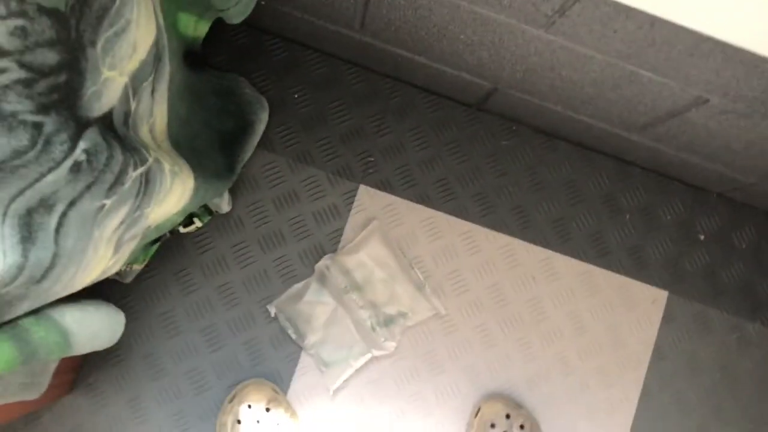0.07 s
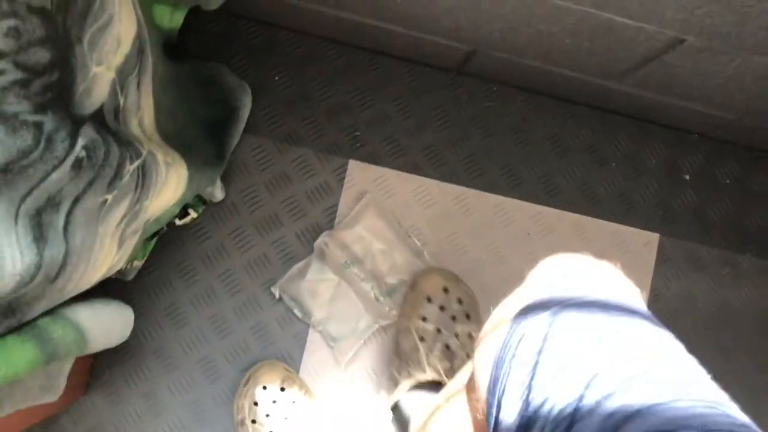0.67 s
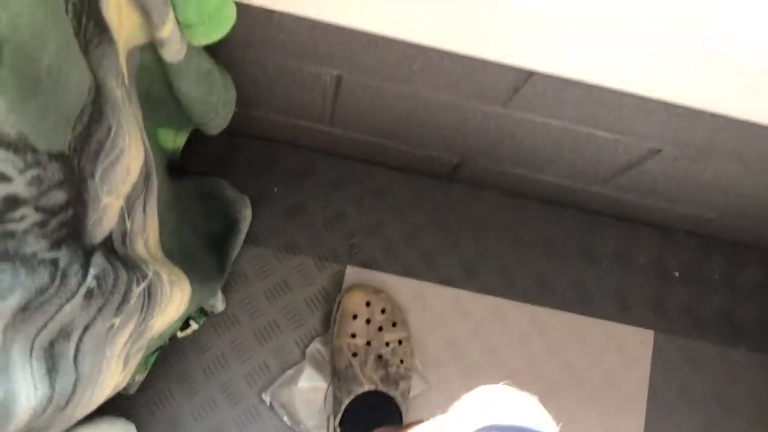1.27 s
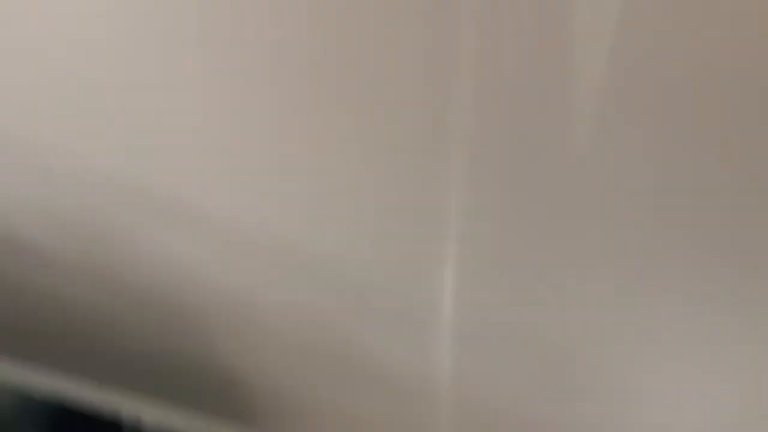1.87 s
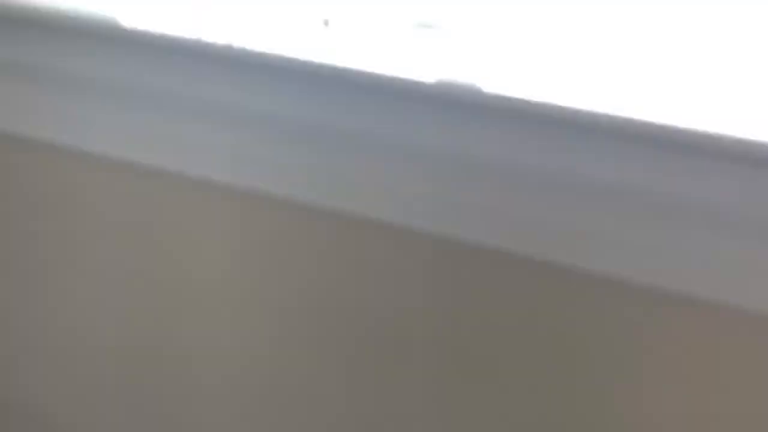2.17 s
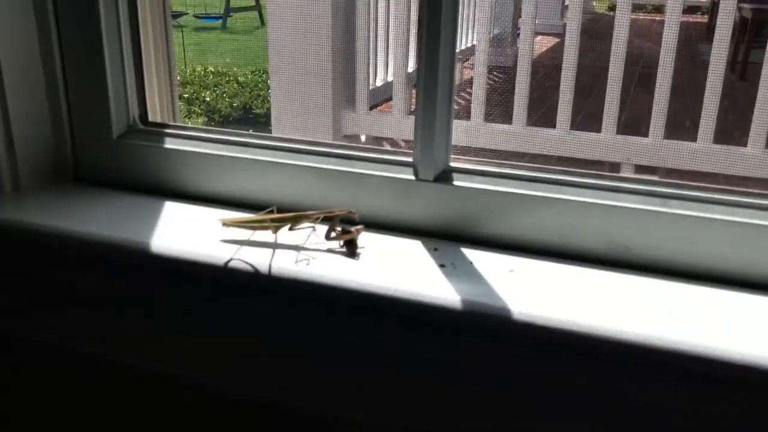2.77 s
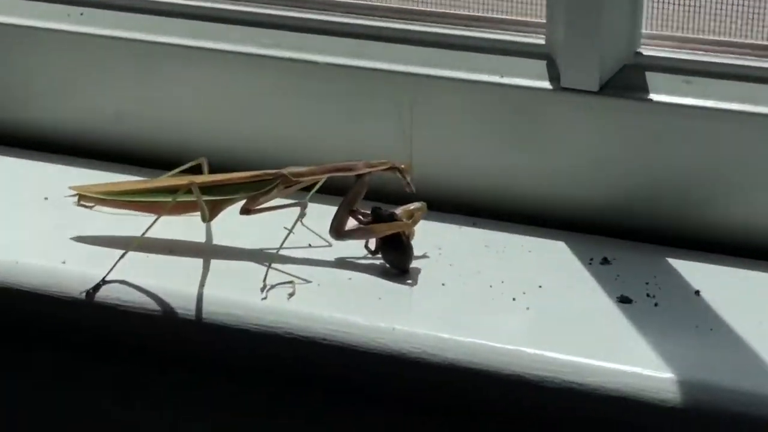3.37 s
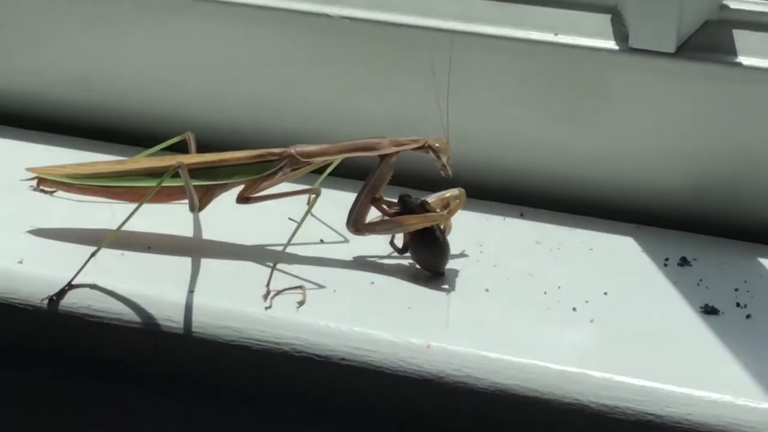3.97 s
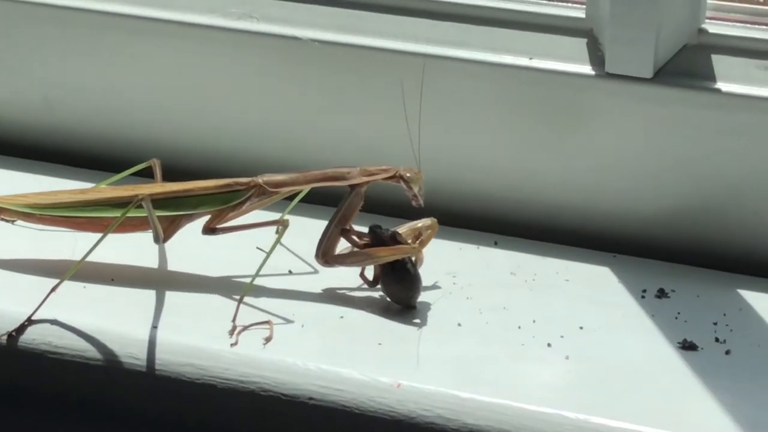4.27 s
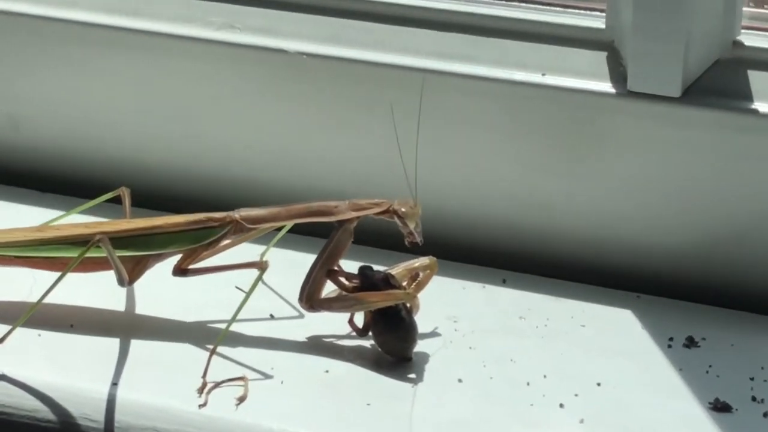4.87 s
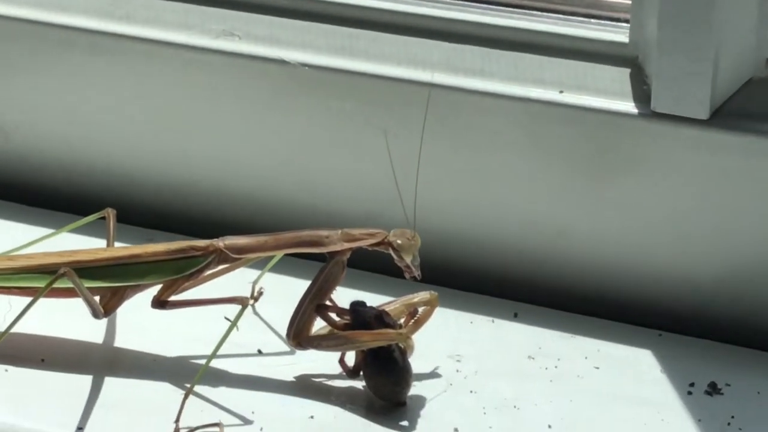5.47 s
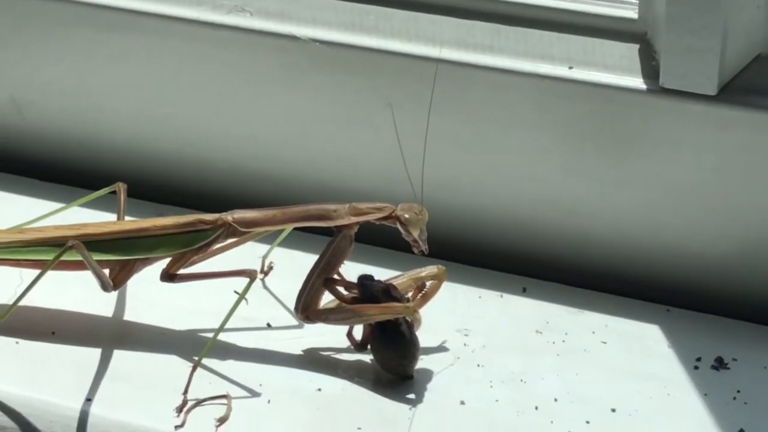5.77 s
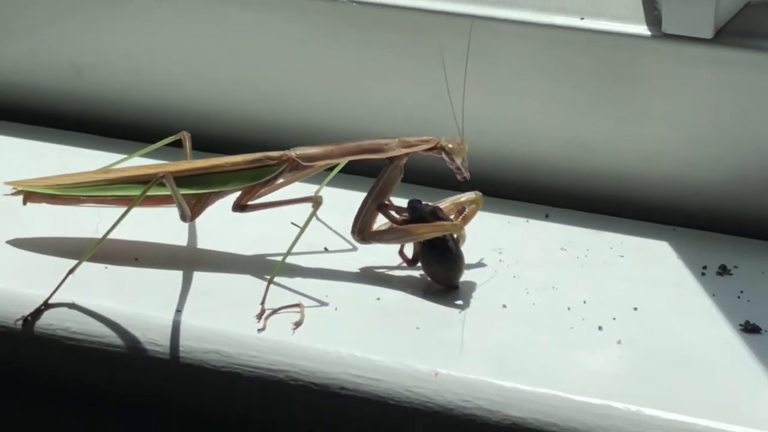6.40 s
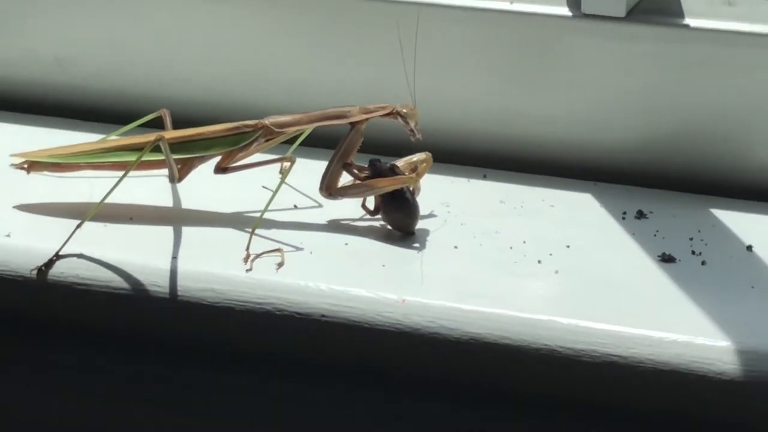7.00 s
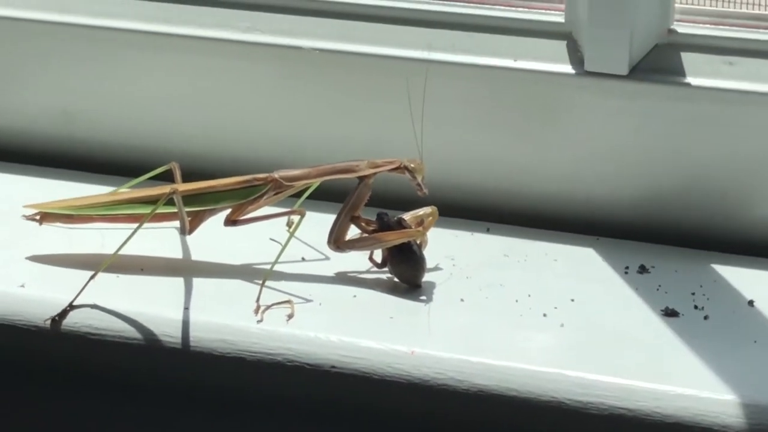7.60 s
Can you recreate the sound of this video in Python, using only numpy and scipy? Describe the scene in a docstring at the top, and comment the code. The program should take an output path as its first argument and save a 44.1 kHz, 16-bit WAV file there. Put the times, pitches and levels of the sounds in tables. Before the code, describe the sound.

After a faint brush of clothing, a plastic air pillow rustles and crackles under a scuffing rubber sole, heard from close by. The crackling eases, then builds as the shoe presses harder, until the pillow pops with a sharp bang far louder than everything else. The echo fills the hard room and fades, and the flat plastic rustles a little more over a faint electrical hum.

```python
"""In a hard, echoing room, a rubber shoe nudges, rubs and treads on a plastic air pillow.
Clothing brushes as the leg moves. The film rustles and snaps as its creases flip, groans as it drags
stretched against the sole, and bursts. The freed air drives a peak limiter and sets the room ringing
for over a second. Then the empty film crinkles again over a low mains hum."""
import sys
import numpy as np
from scipy import signal
from scipy.fft import rfft, irfft
from scipy.io import wavfile
from scipy.ndimage import uniform_filter1d, minimum_filter1d

SR = 44100
rng = np.random.default_rng(int(sys.argv[2]) if len(sys.argv) > 2 else 0)


def wav_out(sig):
    """Save sig, one row per channel (or a flat mono array), as 16-bit PCM at SR to the path in sys.argv[1]."""
    wavfile.write(sys.argv[1], SR, np.round(np.clip(np.atleast_2d(sig).T, -1, 1) * 32767).astype(np.int16))


N = 336924
TIME = np.arange(N) / SR

# The seam splits, then the skin flies open and goes slack.
# Each row: start in seconds, relative peak in dB, first and last pitch in Hz, length in seconds.
BURST_SWINGS = [(4.8117, -3.5, 2200, 1550, .0023), (4.8118, -20, 5900, 5100, .0014),
                (4.8130, 0, 1050, 700, .0027), (4.8148, -15, 480, 300, .005)]
BURST_S = BURST_SWINGS[0][0]
# The taut skin buckles. Each row: start in seconds, peak in dB, first and last pitch in Hz,
# length in seconds.
BUCKLE_SWINGS = [(2.4916, -38, 310, 166, .014), (2.859, -44, 2040, 196, 0.0077),
                 (3.4965, -52, 1180, 251, .007), (3.55, -46, 1900, 176, .009),
                 (4.79, -25.5, 1670, 734, 0.0028)]
# The shoe presses or drags the film. Each row: start and length in seconds, relative levels of crinkle
# and of rubbing in dB, fizz in dB relative to the crinkle.
SHOE_PRESSES = [(0.936, .1, -58, -54.5, -11), (1.06, 0.064, -53, -57, -5), (1.216, 0.34, -51, -51, -13),
                (1.55, 0.26, -49, -53, -16), (1.99, 0.25, -49.5, -51, -22), (2.2, 0.41, -53, -62, -12),
                (2.46, .3, -52, -56, -7), (2.72, 0.22, -58.5, -63, -16), (3.006, 0.093, -58, -65, -24),
                (3.153, 0.068, -57.5, -64, -25), (3.207, 1, -65, -69.5, -12),
                (3.965, .15, -58.5, -67.5, -7), (4.118, .14, -52, -63, -3), (4.2, 0.26, -48, -56.5, -0.5),
                (4.47, .21, -43.5, -56.5, -2), (4.66, 0.12, -51.5, -62.5, -1.5),
                (6.249, 0.23, -61.5, -72.5, -9), (6.42, .15, -59.5, -66, -4.5), (6.52, 0.39, -69, -79, -3),
                (6.914, 0.073, -54.5, -61, -8), (6.948, 0.13, -49, -50.5, -8), (7.011, .3, -56, -66, -15),
                (7.39, 0.22, -59, -76, -3)]
# Single creases snap through. Each row: start in seconds, relative level in dB, offsets of the ring
# and of the fizz in dB.
CREASE_SNAPS = [(0.3496, -43, -9, -7), (0.39, -47.5, -18, -4.5), (0.8954, -42.5, -22, -13),
                (1.6246, -32, -18, -10), (1.6776, -36, -3.5, -15), (1.8966, -49.5, -7, -11),
                (2.2371, -37, 5.5, -17), (2.2812, -42, -13, -14), (2.309, -35.5, -5, -5.5),
                (2.383, -30.5, -22, -20), (2.4244, -35.5, -7, -14), (2.4548, -34, -11, -21),
                (2.5309, -32.5, -3, -5), (2.5541, -37.5, 3, -22), (2.6476, -32.5, -19, -17),
                (2.6744, -35, -22, -16), (2.7998, -40.5, -5, -10), (2.9906, -47, -2, -11),
                (3.045, -52, 3, -23), (3.1535, -48.5, 3, -23), (3.2858, -43.5, -10, -13),
                (3.3328, -41.5, -5, -13), (3.419, -49, -1, -9), (3.533, -43, 1, -13),
                (3.5861, -45, -6.5, -11), (3.693, -38, -3, -10.5), (3.8694, -57.5, -14.5, 2.5),
                (3.9658, -34, -19, -16), (4.0083, -36, -18.5, -4), (4.115, -27, -9.5, -13),
                (4.2664, -34.5, -16.5, -10), (4.2784, -27.5, -3.5, -11), (4.3012, -29.5, -18.5, -13),
                (4.4135, -32, -19, -5.5), (4.4512, -32, -10.5, -10.5), (4.4999, -34, -9, -13.5),
                (4.557, -27.5, -14, -17), (4.5764, -28, -9, -16), (4.6827, -34.5, -17, -10.5),
                (6.0944, -76, -8, 6), (6.1707, -62, -3, -1), (6.262, -49.5, -15, -17),
                (6.3144, -46.5, 5, -9), (6.8533, -51.5, -19, -16), (7.1706, -36.5, -18, -2),
                (7.3768, -36.5, -19, -13), (7.441, -36.5, -27, -7.5), (7.4952, -35.5, -26, -13),
                (7.5926, -46.5, -16, 2.5)]
# The sole scuffs. Each row: start in seconds, level in dB, length in seconds, dull push and floor thump
# in dB relative to that level.
SOLE_SCUFFS = [(0.447, -72, 0.013, 13.5, 13.5), (0.886, -59.5, 0.037, -2, -17),
               (0.949, -49.5, 0.026, -10, -27), (1.235, -43, 0.08, -11.5, -23),
               (1.299, -38, 0.014, -5.5, -19), (1.325, -39, 0.019, -2.5, -18),
               (1.974, -48, 0.038, -9.5, -33), (2.028, -38, 0.015, 0, -3), (2.548, -58.5, 0.026, -4, 7),
               (4.267, -51, 0.045, -8, -9), (4.55, -46.5, 0.036, -18.5, -20),
               (6.951, -45.5, 0.039, -4.5, -13), (7.001, -43, 0.013, -8, -11)]
# The course of the groan. Each row: time in seconds, pitch in Hz, level in dB.
GROAN_PATH = [(4.488, 194.3, -58), (4.518, 189.5, -48.5), (4.546, 181.5, -52), (4.676, 173, -54),
              (4.704, 179.1, -56), (4.738, 188.2, -51.5), (4.768, 189.8, -51), (4.786, 190, -49.5)]
# Clothing brushes as the leg lifts, then swings. Each row: start and length in seconds, level in dB.
LEG_SWISHES = [(0.019, 0.15, -56.5), (0.462, 0.26, -72.5)]
# How the echo dies away, fastest in the high treble.
# Each row: frequency in Hz, time to fall by 60 dB in seconds.
ECHO_FADE = [(60, .72), (150, .78), (350, .88), (700, 1.12), (1800, 1.18), (4000, 1.1), (8000, .76),
             (12000, .54), (16000, .42)]
# The mains hum. Each row: frequency in Hz, relative level in dB.
MAINS_LINES = [(59.2, -9), (118.4, -13), (177.6, -6.5)]

# Spectra of the noises. Each row: frequency in Hz, relative spectral density in dB.
BANG_SPECTRUM = [(25, -33.5), (45, -25.5), (90, -9.5), (125, -14), (200, -7.5), (250, -5.5), (335, -3.5),
                 (450, -7), (620, -1), (860, -1), (1250, -12.5), (1780, -10.5), (2300, -19.5), (6000, -32),
                 (16000, -40.5)]  # the bang as it fills the room
FULL_FILM_SPECTRUM = [(500, -33.5), (900, -11), (1300, -5.5), (1750, 0.5), (2200, -2), (2750, -3),
                      (3500, 0), (5400, -8.5), (7500, -10), (10200, -17), (15000, -16), (16000, -21.5)]  # creases in the inflated pillow
SLACK_FILM_SPECTRUM = [(400, -27), (800, -10.5), (1300, -1.5), (1800, 4), (2500, -2.5), (3500, 3),
                       (5400, -4.5), (7500, -2.5), (11000, -16), (16000, -15)]  # creases in the emptied film
RUB_SPECTRUM = [(60, -21), (130, -5), (300, -4.5), (600, -0.5), (900, 1), (1300, -3), (2200, -14),
                (5000, -33)]  # rubber sliding on film
AIR_SPECTRUM = [(15, -45), (30, -19), (59, 0), (130, -9.5), (180, -4.5), (250, -6.5), (373, -7.5),
                (489, -11.5), (677, -12.5), (1370, -25), (2280, -22.5), (6380, -32.5), (11900, -34),
                (16000, -39)]  # the room's rumble and hiss
CRUNCH_SPECTRUM = [(300, -13.5), (1000, -7.5), (1700, -3), (3500, -1), (7000, -5.5), (12000, -7),
                   (16000, -14)]
PUSH_SPECTRUM = [(60, -32), (200, -8.5), (380, 2.5), (550, -5), (1000, -1), (1700, -2.5), (4000, -30)]
THUMP_SPECTRUM = [(30, -23.5), (90, -4.5), (160, 5), (330, -6.5), (600, -7.5), (1500, -34.5)]
CLOTH_SPECTRUM = [(500, -16), (1400, 4), (2500, 1.5), (4200, 6), (6500, -2.5), (15000, -11)]


def burst(pop_db=11.5, rip_db=-11.5, room_db=24, leak_db=-27, leak_s=.022, rip_peak_s=.00042):
    """Sudden pressure release: air leaks, the seam rips, and the pulse sets the room ringing."""
    t = np.arange(2 * SR) / SR
    out = amp(pop_db) * sum(buckle(*row) for row in BURST_SWINGS)
    rip = evened(band(rng.standard_normal(len(t)), 3300, 19000))
    rip_envelope = t / rip_peak_s * np.exp(1 - t / rip_peak_s)
    add(out, BURST_S, amp(pop_db + rip_db) * rip * rip_envelope)
    leak = colour(rng.standard_normal(len(t)), BANG_SPECTRUM) * (t / leak_s) * (t < leak_s)
    add(out, BURST_S - leak_s, amp(leak_db) * leak)
    tail = np.pad(echo_tail(build_s=.0051, early_db=6.5, early_s=.13), (0, SR))
    add(out, BURST_S, amp(room_db) * colour(tail, BANG_SPECTRUM))
    return out


def buckle(start, db, first_hz, last_hz, length):
    """A membrane's frequency falls with its tension: the skin swings briefly, slowing as it slackens."""
    out, count = np.zeros(N), max(int(length * SR), 2)
    cycles = np.cumsum(np.geomspace(first_hz, last_hz, count)) / SR
    add(out, start, amp(db) * np.sin(2 * np.pi * cycles) * signal.windows.tukey(count, .5))
    return out


def rustle(gain_db=-2, fizz_db=-1, clump_db=4.5, ticks_db=-11):
    """Crumpling and friction: each press sets off clumps of creases, dull rubbing and a taut fizz."""
    grains = creases(per_s=5300, spread_db=2.5, hiss=1)
    grains = evened(grains * amp(clump_db * wander(60)))
    full, slack = colour(grains, FULL_FILM_SPECTRUM), colour(grains, SLACK_FILM_SPECTRUM)
    fizz = evened(band(creases(per_s=680, spread_db=6.5, hiss=.25), 5900, SR / 2))
    crinkle = np.where(TIME < BURST_S, full, slack) + amp(ticks_db) * ticks()
    rub = colour(creases(per_s=720, spread_db=0, hiss=1.1), RUB_SPECTRUM)
    out = np.zeros(N)
    for start, length, crinkle_db, rub_db, taut_db in SHOE_PRESSES:
        film = crinkle + amp(fizz_db + taut_db) * fizz
        effort = arch(start, length, skew=.64, roundness=.78)  # builds faster than it eases
        out += effort * (amp(crinkle_db) * film + amp(rub_db) * rub)
    return amp(gain_db) * out


def creases(per_s, spread_db, hiss):
    """Shot noise: tiny independent clicks arrive at random over the smooth hiss of sliding."""
    size = amp(spread_db * np.minimum(rng.exponential(1, N), 4))
    clicks = size * rng.choice([-1, 1], N) * (rng.random(N) < per_s / SR)
    return evened(evened(clicks) + hiss * rng.standard_normal(N))


def ticks(pitches=14, per_pitch_per_s=3.5, decay_s=.0018):
    """Damped resonance: stray creases flip at random, each ringing briefly in a band of its own."""
    out, t = np.zeros(N), np.arange(500) / SR
    for hz in np.geomspace(1500, 11000, pitches):
        tick = band(rng.standard_normal(len(t)) * np.exp(-t / decay_s), hz * .7, hz * 1.4)
        clicks = (rng.random(N) < per_pitch_per_s / SR) * rng.uniform(.3, 1, N)
        out += signal.oaconvolve(clicks, evened(tick) / hz ** .25)[:N]
    return evened(out)


def snaps(gain_db=-10, ring_db=7, own_db=-3, fizz_db=4.5, full_hz=1760, slack_hz=2430):
    """Snap-through buckling: a crease flips with a crack, rings briefly and shakes the film nearby."""
    out, t = np.zeros(N), np.arange(4096) / SR
    flip = (1 - np.exp(-t / .00039)) * np.exp(-t / .0035)
    shake = flip + .21 * np.exp(-t / .014)  # the film flutters on after the flip
    for start, db, ring_offset_db, fizz_offset_db in CREASE_SNAPS:
        film_hz = (full_hz if start < BURST_S else slack_hz) * np.exp(.06 * rng.standard_normal())
        own_hz = 2430 * (5800 / 2430) ** rng.random()  # the crease's own pitch
        crack_noise, fizz_noise, ring_noise = rng.standard_normal((3, len(t)))
        crack = 2 * band(crack_noise * shake, 2000, 7500)
        fizz = 2 * amp(fizz_db + fizz_offset_db) * band(fizz_noise * shake, 6100, 17000)
        film_ring, own_ring = (evened(band(ring_noise * flip, hz * .85, hz * 1.15)) * np.std(flip)
                               for hz in (film_hz, own_hz))
        ring = amp(ring_db + ring_offset_db) * film_ring + amp(own_db) * own_ring
        add(out, start, amp(db + gain_db) * (crack + fizz + ring))
    return out


def scuffs(fall_s=.0072):
    """Superposition: creases crushed at once merge into a crunch, over the sole's push and thump."""
    crunch = colour(creases(per_s=5000, spread_db=2.5, hiss=.29), CRUNCH_SPECTRUM)
    push = colour(rng.standard_normal(N), PUSH_SPECTRUM)
    thump = colour(rng.standard_normal(N), THUMP_SPECTRUM)
    out = np.zeros(N)
    for start, db, length, push_db, thump_db in SOLE_SCUFFS:
        rise_s = .0029 * (length / .03) ** 2  # a longer scuff bites more gradually
        t = np.maximum(TIME - start, 0)
        press = (1 - np.exp(-t / rise_s)) * np.exp(-np.clip((t - length) / fall_s, 0, 20))
        out += amp(db) * press * (crunch + amp(push_db) * push + amp(thump_db) * thump)
    return out


def groan(under_db=-8, under_hz=123, under_peak_s=4.56, under_width_s=.071):
    """Frictional vibration: the sole drags a wavering note from taut film, at first over a lower one."""
    times, hz, db = np.transpose(GROAN_PATH)
    pitch_hz = np.interp(TIME, times, hz) * (1 + .025 * wander(30))
    grip = amp(1.8 * wander(45))
    note = grip * np.sin(2 * np.pi * np.cumsum(pitch_hz) / SR)
    under_swell = np.exp(-((TIME - under_peak_s) / under_width_s) ** 2)
    under = amp(under_db) * under_swell * np.sin(2 * np.pi * under_hz * TIME)
    envelope = amp(np.interp(TIME, times, db)) * (TIME >= times[0]) * (TIME <= times[-1])
    return np.sqrt(2) * envelope * (note + under)


def swish():
    """Sliding friction: cloth gives a soft broadband hiss that gathers slowly and stops quickly."""
    cloth = colour(rng.standard_normal(N), CLOTH_SPECTRUM)
    return cloth * sum(amp(db) * arch(start, length, skew=1.37, roundness=.55)
                       for start, length, db in LEG_SWISHES)


def echo_tail(build_s, early_db, early_s):
    """Exponential decay: dense echoes build up, fall fast at first, then die away band by band."""
    hz, frame_s, spectrum = signal.stft(rng.standard_normal(2 * SR), SR, nperseg=512)
    decay = np.exp(-np.log(1000) * frame_s / read(ECHO_FADE, hz)[:, None])
    tail = signal.istft(spectrum * decay, SR)[1]
    t = np.arange(len(tail)) / SR
    tail *= 1 - np.exp(-t / build_s)
    tail *= 1 + amp(early_db) * np.exp(-(t / early_s) ** 2)
    return tail / np.linalg.norm(tail)


def room_tone(gain_db=-63, air_db=-2, dip_db=14, return_s=2.2):
    """Unsteady mains harmonics over broadband noise; the level sinks at the bang and creeps back."""
    hum = np.zeros(N)
    for hz, db in MAINS_LINES:
        strength = np.sqrt(2) * amp(db + 2 * wander(2))
        hum += strength * np.sin(2 * np.pi * hz * TIME + .65 * wander(4))
    air = amp(air_db) * colour(rng.standard_normal(N), AIR_SPECTRUM)
    dip = (TIME > BURST_S) * np.exp(-abs(TIME - BURST_S) / return_s)
    return (air + hum) * amp(gain_db - dip_db * dip)


def amp(db):
    """Converts decibels to an amplitude ratio."""
    return 10 ** (np.asarray(db) / 20)


def evened(x):
    """Normalises to rms 1."""
    return x / np.sqrt(np.mean(x ** 2) + 1e-20)


def read(points, hz):
    """Interpolates a table along a log-frequency axis."""
    table_hz, value = np.transpose(points)
    return np.interp(np.log(hz + 1), np.log(table_hz + 1), value)


def add(mix, start, sound):
    """Superposes a sound on the mix from a start in seconds."""
    part = mix[max(round(start * SR), 0):][:len(sound)]
    part += sound[:len(part)]


def colour(x, points, size=4096):
    """Applies a minimum-phase filter of unit energy with the given spectrum."""
    log_gain = np.log(amp(read(points, abs(np.fft.fftfreq(size, 1 / SR)))))
    response = np.exp(np.conj(signal.hilbert(log_gain)))
    taps = np.fft.ifft(response).real[:size // 2]
    return signal.oaconvolve(x, taps / np.linalg.norm(taps))[:len(x)]


def band(x, lo_hz, hi_hz):
    """Applies a gentle band-pass filter."""
    sections = signal.butter(2, [lo_hz, min(hi_hz, SR / 2 - 1)], "band", fs=SR, output="sos")
    return signal.sosfilt(sections, x)


def wander(rate_hz):
    """Low-passed noise gives a slow random fluctuation of rms 1."""
    hz = np.fft.rfftfreq(N, 1 / SR)
    return evened(irfft(rfft(rng.standard_normal(N)) / (1 + (hz / rate_hz) ** 2) ** 2, N))


def arch(start, length, skew, roundness):
    """An envelope that builds, peaks and eases off; a skew under 1 peaks early."""
    progress = np.clip((TIME - start) / length, 0, 1)
    moving = (progress > 0) & (progress < 1)
    gain = np.zeros(N)
    gain[moving] = np.sin(np.pi * progress[moving] ** skew) ** roundness
    return gain


def scene(echo_db=-5):
    """Sound pressures add: the burst, film and cloth with their echo, knocks, groan and room tone."""
    direct = swish() + rustle() + snaps() + scuffs()
    echo = signal.oaconvolve(direct, echo_tail(build_s=.0027, early_db=-5, early_s=.066))[:N]
    knocks = sum(buckle(*row) for row in BUCKLE_SWINGS)
    return (burst() + direct + amp(echo_db) * echo + knocks + groan() + room_tone())[None]


def record(dry, bass_hz=42, top_hz=16300, ceiling=.92, recover_db_per_s=115):
    """Band and peak limiting: the gain ducks on the bang and then recovers, so the echo swells."""
    sound = signal.sosfilt(signal.butter(2, bass_hz, "high", fs=SR, output="sos"), dry[0])
    over_db = 20 * np.log10(np.maximum(abs(sound) / ceiling, 1))
    recovery_db = TIME * recover_db_per_s
    held_db = np.maximum.accumulate(over_db + recovery_db) - recovery_db
    duck_db = uniform_filter1d(minimum_filter1d(-held_db, size=140), size=70)  # looks a little ahead
    low_pass = signal.firwin(255, top_hz, window=("kaiser", 9), fs=SR)
    return signal.oaconvolve(sound * amp(duck_db), low_pass, "same")[None]


dry = scene()
out = record(dry)
wav_out(out)
```